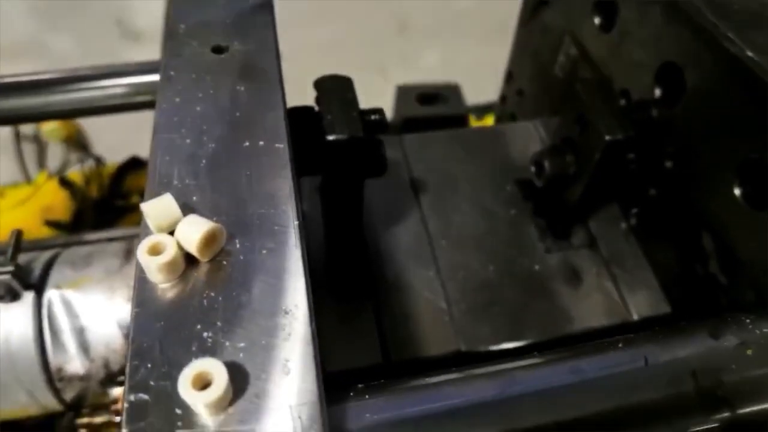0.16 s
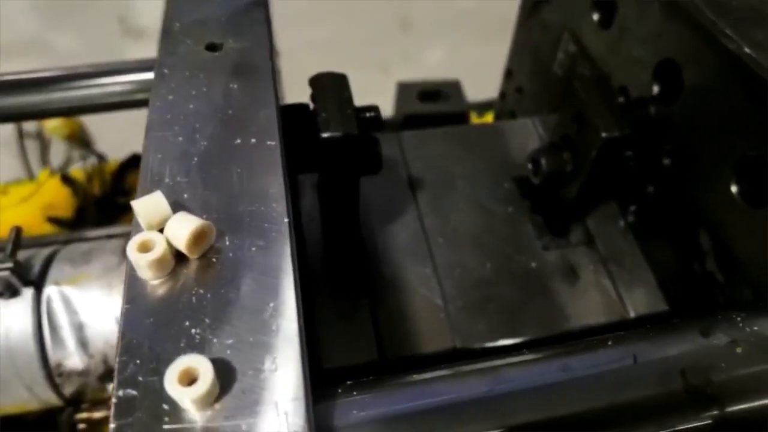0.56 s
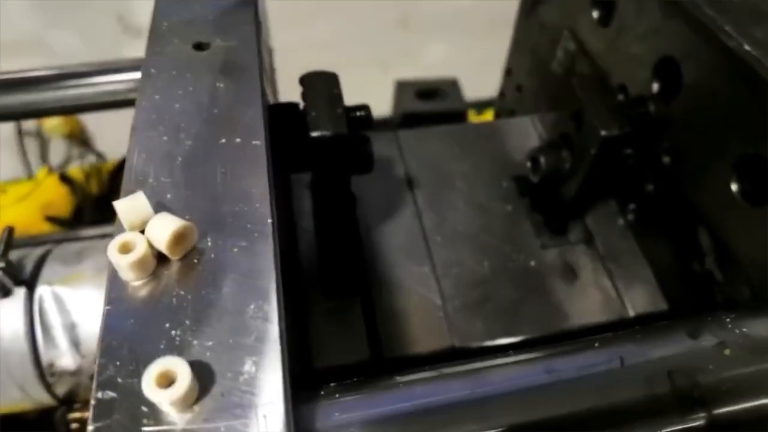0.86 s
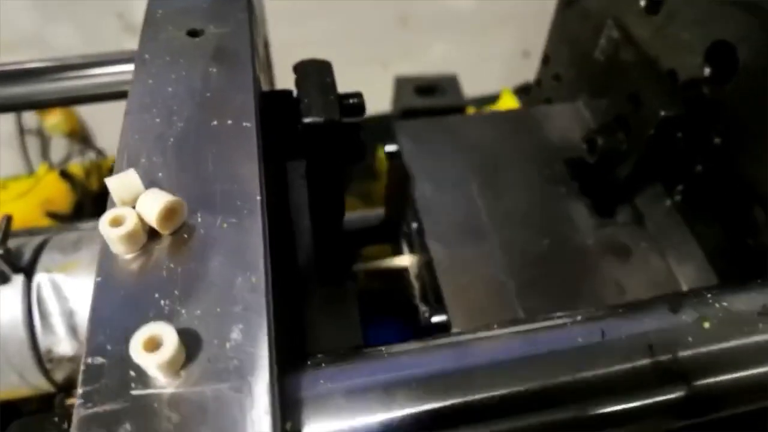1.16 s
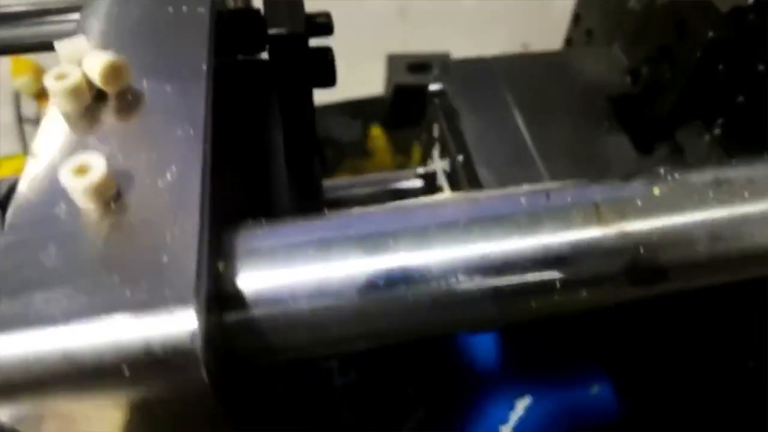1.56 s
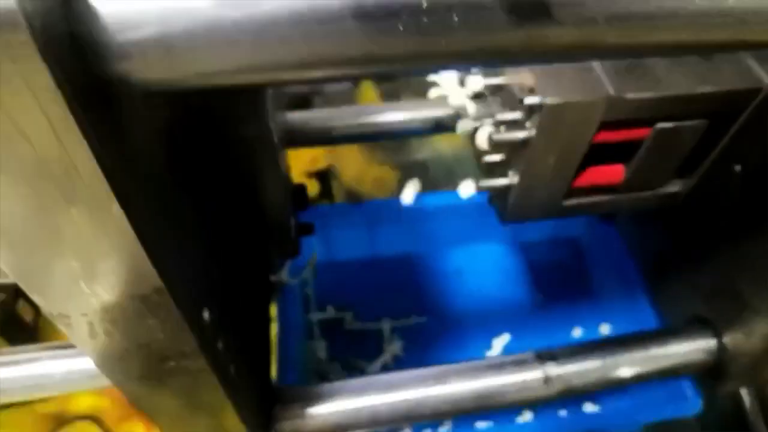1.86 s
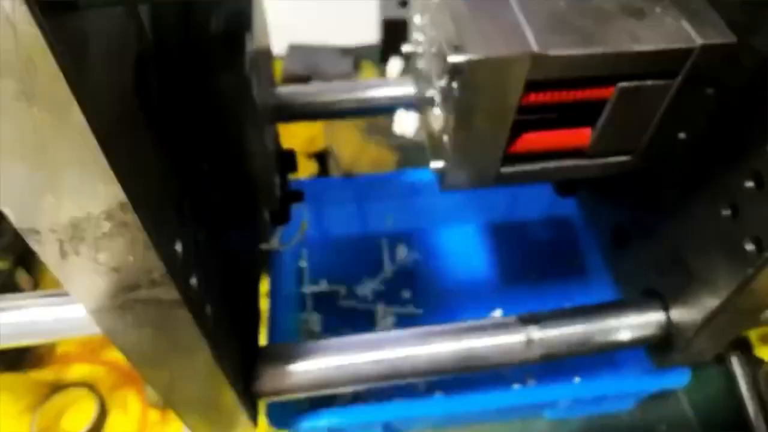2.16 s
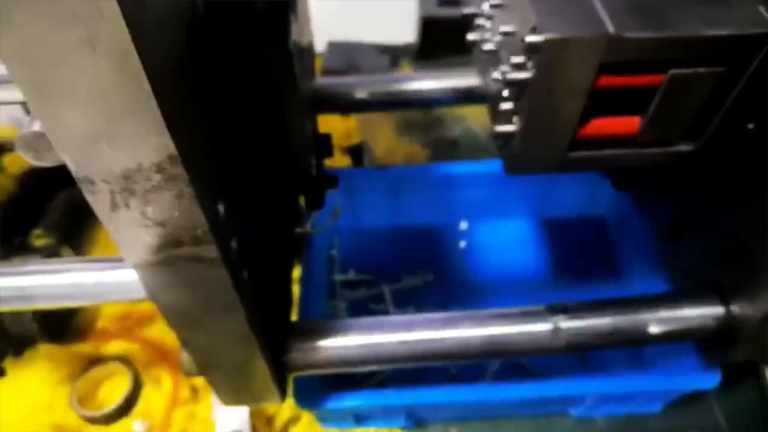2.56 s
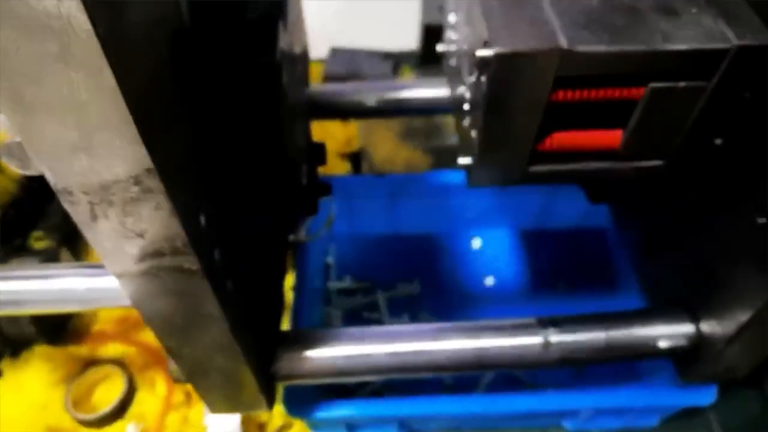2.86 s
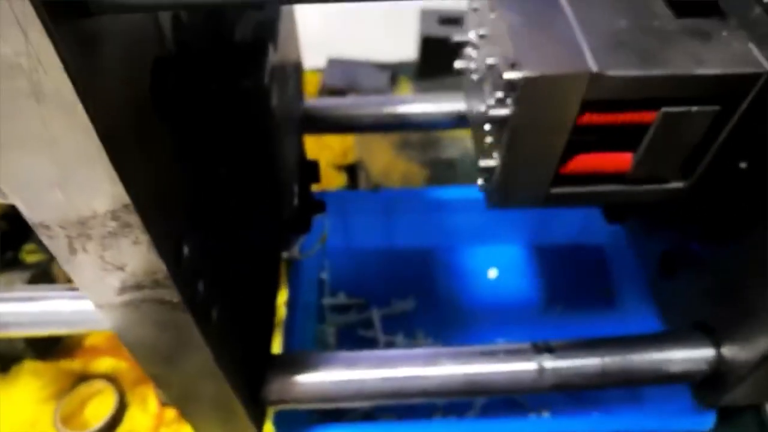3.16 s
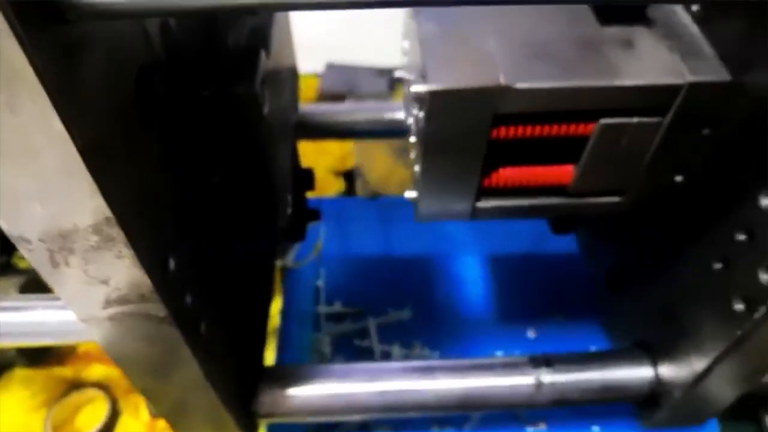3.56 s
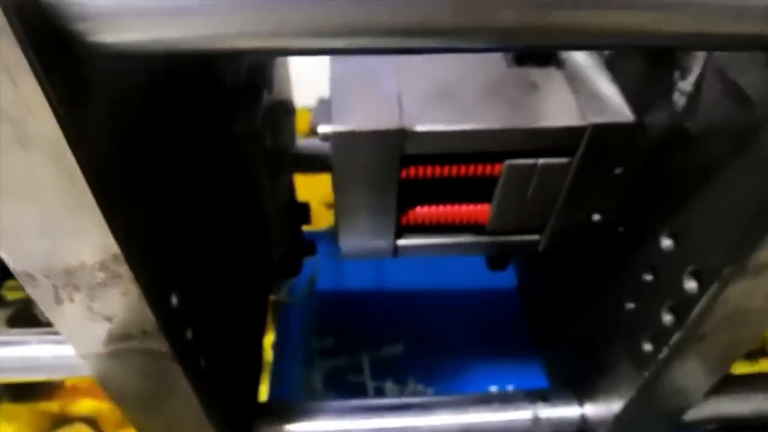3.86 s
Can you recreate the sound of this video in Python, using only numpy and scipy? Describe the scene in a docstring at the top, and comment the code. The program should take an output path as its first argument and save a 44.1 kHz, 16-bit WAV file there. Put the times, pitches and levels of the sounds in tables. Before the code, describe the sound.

A small injection molding machine whines, then its mold opens with rattling steel clacks and scrapes

```python
"""A pump's whine and oil rush come first, over thin drive whistles: a small injection molding machine, close
up. The mold cracks open in a rattle of steel clacks: shaped noise bursts, coloured by mold modes, with
reverberation. The platen scrapes and rumbles along its bars, and low groans glide down: filtered noise and
gliding tones; thuds boom below. A valve hisses briefly, then a panel drones as the platen returns; the workshop
is a bed of coloured noise."""
import sys
import numpy as np
from scipy import signal
from scipy.fft import rfft, irfft
from scipy.io import wavfile
from scipy.ndimage import uniform_filter1d

SR = 44100
rng = np.random.default_rng(int(sys.argv[2]) if len(sys.argv) > 2 else 0)


def generate_wav(sig):
    """Save sig (samples, or channels by samples) to the path in sys.argv[1] as 16-bit PCM at SR."""
    pcm = np.round(np.clip(np.atleast_2d(sig).T, -1, 1) * 32767).astype(np.int16)
    wavfile.write(sys.argv[1], SR, pcm)


N = 176400
T, BINS = np.arange(N) / SR, np.fft.rfftfreq(N, 1 / SR)  # time in s, spectrum bins in Hz

# All spectra below are relative: each sound is brought to a set loudness before its level is applied.
# Workshop background colour [f/Hz, level per Hz/dB]
SHOP_COLOUR = [(15, -44), (45, -9), (110, 6), (220, 2.5), (460, 1.5), (700, -5.5), (1350, -14), (1850, -8),
               (3700, -15.5), (8100, -12.5), (9300, -50.5)]
# Workshop background loudness [t/s, level/dB]
SHOP_LEVEL = [(2.3, -44.5), (3.2, -44), (3.55, -43.5), (3.75, -46.5)]

# Whistles of the motor drive [start t/s, end t/s, f/Hz, level/dB]
DRIVE_HZ = 8297
DRIVE_WHISTLES = [(0, 0.073, DRIVE_HZ, -32), (0.08, 0.326, DRIVE_HZ, -40.5),
                  (0.327, 0.418, DRIVE_HZ, -29.5), (0.41, 0.74, DRIVE_HZ, -36.5),
                  (0.727, 0.819, DRIVE_HZ, -25), (1.204, 2.53, DRIVE_HZ, -44), (2.53, 2.87, DRIVE_HZ, -52),
                  (0, 0.756, 7690, -38.5), (1.2, 2.866, 7710, -49), (2.966, 3.579, 8120, -47.5)]
WHISTLE_FADE_S, WHISTLE_JITTER = 0.008, 0.00015  # jitters are rms fractions of the pitch

# Upper multiples of the pump whine, before the whine level curve [multiple, level/dB]
WHINE_MULTIPLES = [(5, -37.5), (6, -44), (7, -37.5), (8, -43.5)]
# Level curve of the whine and hums, on top of their own levels [t/s, level/dB]
WHINE_LEVEL = [(0, 3.5), (.28, -2), (.79, 0), (.86, -14.5), (1.15, -13.5), (1.25, -40)]
# Loudness of the strong fourth multiple [t/s, level/dB]
FOURTH_LEVEL = [(0, -21), (.285, -24), (.295, -28.5), (.58, -33), (.63, -28), (.76, -27.5), (.82, -63.5), ]
# Colour of oil rushing through the pump [f/Hz, level per Hz/dB]
OIL_COLOUR = [(15, -38.5), (60, -11), (170, 2.5), (480, -1.5), (800, -2.5), (1500, -8.5), (2400, -5.5),
              (3900, -9), (8200, -8.5), (9300, -37)]
# Loudness of the oil rush [t/s, level/dB]
OIL_LEVEL = [(0, -25.5), (.27, -25), (.33, -29.5), (.5, -26), (.6, -26), (.79, -32.5), (.86, -36),
             (1.15, -38.5), (1.27, -37), (1.4, -76)]
WHINE_HZ, WHINE_JITTER, WAVER_DB = 712, 0.00028, 3.5
HUM_HZ, HUM_DB = 573, -37
LOW_HUM_HZ, LOW_HUM_DB = 466.5, -40.5
THIRD_STEP_S, THIRD_EARLY_DB, THIRD_DB = 0.19, -38.5, -32.5  # the third multiple steps up

# Valve hiss colour [f/Hz, level per Hz/dB]
VALVE_COLOUR = [(40, -22), (130, 7.5), (900, -25.5), (1800, -27), (2500, -0.5), (3200, -25), (3850, -4.5),
                (5600, -0.5), (7000, 5), (8000, -3), (11000, -44.5)]
VALVE_START_S, VALVE_HOLD_S, VALVE_RELEASE_S, VALVE_DB = 2.862, 0.065, 0.034, -31

# Heavy knocks that shake the cabinet [t/s, level/dB, f/Hz]
CABINET_THUDS = [(0.536, -19.5, 194), (0.887, -27, 164), (1.004, -32, 156), (1.146, -27, 185),
                 (1.612, -30, 267), (1.757, -25.5, 201.6), (2.208, -37.5, 248), (2.862, -34.5, 214)]
THUD_RISE_S, THUD_DECAY_S, THUD_RATTLE_DB = 0.004, 0.031, -2

# Low groans that glide down in pitch [start t/s, length/s, level/dB, first f/Hz]
LOW_GROANS = [(0.551, 0.27, -27.5, 190), (1.219, 0.18, -32, 199), (1.642, 0.11, -34, 165.7),
              (1.855, 0.178, -34.5, 160)]
GROAN_TO_HZ, GROAN_JITTER, GROAN_CATCH_DB, GROAN_OCTAVE_DB = 105.96, 0.05, 5.5, -11

# Colour of sliding steel before the mold modes [f/Hz, level per Hz/dB]
SLIDE_COLOUR = [(400, -31.5), (1000, -2), (2200, 6.5), (3800, -1.5), (6100, 6.5), (8000, 1), (9500, -17),
                (11000, -65)]
# Loudness of the scrape [t/s, level/dB]
SLIDE_LEVEL = [(.45, -40.5), (.56, -32.5), (.8, -24), (.87, -27), (1.12, -25.5), (1.22, -34), (1.38, -52),
               (1.49, -36), (1.57, -45), (1.65, -36), (1.73, -44.5), (1.79, -34), (1.88, -43), (2.25, -47),
               (2.8, -46.5), (3.1, -79)]
# Colour of the platen's rumble [f/Hz, level per Hz/dB]
RUMBLE_COLOUR = [(30, -28.5), (60, -19), (80, -2), (125, 0), (230, -2), (330, -10), (600, -21), (1500, -55)]
# Loudness of the rumble [t/s, level/dB]
RUMBLE_LEVEL = [(.51, -48.5), (.54, -27.5), (.805, -32.5), (.83, -68.5), (1.14, -51.5), (1.23, -32.5),
                (1.43, -50.5), (1.58, -45.5), (1.63, -35), (1.8, -37), (1.98, -37.5), (2.15, -48.5),
                (2.3, -42), (2.45, -58), (2.9, -46.5), (3.2, -40.5), (3.75, -72)]
# Loudness of the panel set droning by the returning platen [t/s, level/dB]
DRONE_LEVEL = [(3.04, -90), (3.09, -33), (3.16, -50), (3.23, -27.5), (3.3, -41), (3.37, -33), (3.42, -51.5),
               (3.56, -41), (3.65, -65)]
DRONE_HZ, DRONE_WIDTH_HZ = 197.5, 27
GRIT_PER_S, GRIT_DB = 310, 2.5

# Slow swells in spectral patches, over a constant random unevenness of colour (dB rms)
PATCH_DB, STATIC_RIPPLE_DB = 2.5, 1.8

# Steel clacks of mold and ejector
# [t/s, level/dB, decay/ms, ring f/Hz, ring level/dB, body f/Hz, body level/dB]
STEEL_CLACKS = [(0.289, -13, 1.4, 5960, 36, 4100, 12.5), (0.296, -11.5, 3.3, 6060, 17, 4070, 14.5),
                (.532, -13, 5.1, 7750, -20.5, 650, 22.5), (0.818, -6.5, 1.5, 5870, 14, 4800, 0),
                (.839, -18, 5.2, 5940, -4, 2900, 5.5), (.894, -16, 3.8, 6000, 9.5, 1480, 13),
                (.894, -20, 28, 1330, 12, 960, 33), (0.936, -21, 5.3, 5980, 1, 1200, 18),
                (.944, -12, 3.2, 5880, 9, 3300, -8), (0.962, -12.5, 6.8, 6500, 8.5, 3000, 8),
                (1.002, -16.5, 7.4, 6260, 8, 2220, -9), (1.030, -13, 7.5, 6000, 17.5, 3180, 13),
                (1.041, -18, 3.9, 6200, 15.5, 2105, 23.5), (1.071, -37.5, 2.8, 6260, -13, 3170, 11),
                (1.146, -14, 5.7, 7650, 9, 1680, 15), (1.189, -9, 1.5, 6300, 14.5, 4340, -16),
                (1.239, -24.5, 9.6, 6200, 24.5, 4200, 20.5), (1.306, -30.5, 22, 6150, 9, 3000, -21),
                (1.454, -18.5, 4.6, 8500, 3.5, 1120, 4.5), (1.615, -16.5, 6, 8200, 11, 5360, 6),
                (1.756, -17, 8.5, 7830, 8.5, 750, 15.5), (1.764, -20, 24, 8400, 20.5, 1800, 20),
                (1.869, -26.5, 5.3, 7900, 28, 2100, -1), (1.92, -29, 14, 7900, 14.5, 2050, 11),
                (2.066, -12, 3.5, 6100, 2, 1070, 7.5), (2.299, -29.5, 9, 6070, 15, 4070, 17),
                (2.862, -26.5, 6.7, 6700, -2, 1930, 7.5),]
# Colour shared by all clacks, before resonances [f/Hz, level per Hz/dB]
STEEL_COLOUR = [(60, -32.5), (520, -9.5), (880, -8), (1500, -6), (3300, 0.5), (5500, 0.5), (8200, 3.5),
                (9500, -5.5), (11000, -43)]
# Modes of the steel mold, heard in clacks, scrape and reverberation [f/Hz, level/dB]
MOLD_MODES = [(856, -2), (1120, -3), (1830, -9.5), (2120, -9.5), (2982, -5.5), (4199, -4.5), (5330, -3),
              (5712, -4.5), (6250, -5.5), (7074, -8)]
# Reverberation time of the workshop [f/Hz, t60/s]
ROOM_T60 = [(150, 0.28), (1000, 0.24), (4000, 0.43), (9000, 0.37)]
CLACK_RISE_S, RING_WIDTH_HZ, BODY_WIDTH_HZ, MODE_WIDTH_HZ = 0.0023, 460, 200, 200
RING_ON_DB, ROOM_RIPPLE_DB = -8, 4.5

STOP_S, STOP_FADE_S, EDGE_HZ = 3.797, 0.016, 9900


def amp(db):
    """Decibels to gain."""
    return 10 ** (np.asarray(db) / 20)


def evened(x):
    """Scales to rms 1."""
    return x / np.sqrt(np.mean(x ** 2) + 1e-20)


def read(points, hz):
    """Reads a frequency table on a log-frequency axis."""
    f, value = np.transpose(points)
    return np.interp(np.log(hz + 1), np.log(f + 1), value)


def level(points):
    """A level curve as gain per sample."""
    return amp(np.interp(T, *np.transpose(points)))


def add(mix, s, sound):
    """Mixes a sound in at time s."""
    part = mix[max(round(s * SR), 0):][:len(sound)]
    part += sound[:len(part)]


def wander(rate_hz):
    """Slow random drift of rms 1, mostly below the given rate."""
    return evened(irfft(rfft(rng.standard_normal(N)) / (1 + (BINS / rate_hz) ** 4), N))


def noise(spectrum):
    """Noise of rms 1 with the given colour."""
    return evened(irfft(rfft(rng.standard_normal(N)) * amp(read(spectrum, BINS)), N))


def steadied(x, seconds):
    """Takes the chance swells out of a noise by dividing by its running rms."""
    power = uniform_filter1d(x ** 2, max(int(seconds * SR), 2))
    return x / np.sqrt(abs(power) + 1e-9)


def tone(hz, jitter, waver_db):
    """A sine of rms 1 that wavers in pitch and level."""
    turns = np.cumsum(hz * (1 + jitter * wander(25))) / SR
    return evened(np.sin(2 * np.pi * turns) * amp(waver_db * wander(19)))


def patchy(x):
    """Narrow spectral regions swell and fade independently, over a random uneven colour that stays constant."""
    z = signal.stft(x, nperseg=1024, noverlap=768)[2]
    across_pitch = uniform_filter1d(rng.standard_normal(z.shape), size=4, axis=0)
    swells = evened(uniform_filter1d(across_pitch, size=22, axis=1))
    static_ripple = evened(uniform_filter1d(rng.standard_normal(len(z)), size=2))[:, None]
    gain = amp(PATCH_DB * swells + STATIC_RIPPLE_DB * static_ripple)
    return evened(signal.istft(z * gain, nperseg=1024, noverlap=768)[1][:N])


def mold_peaks(hz):
    """Gain that lifts the regions around the modes of the mold."""
    peaks = sum(amp(db) ** 2 / (1 + (2 * (hz - f) / MODE_WIDTH_HZ) ** 2) ** 2 for f, db in MOLD_MODES)
    return np.sqrt(0.5 + 2 * peaks)


def workshop():
    """Background air of the shop: coloured noise with slow spectral swells."""
    return patchy(noise(SHOP_COLOUR)) * level(SHOP_LEVEL)


def drive():
    """Thin switching whistles of the motor drive: near-steady sines that step in level."""
    out = np.zeros(N)
    for start, end, hz, db in DRIVE_WHISTLES:
        gate = np.clip(np.minimum(T - start, end - T) / WHISTLE_FADE_S + 0.5, 0, 1)
        out += amp(db) * gate * tone(hz, WHISTLE_JITTER, waver_db=3.0)
    return out


def pump():
    """Whine at multiples of one tone, two hums and oil noise, on level curves that rise and fall, then die away."""
    whine = sum(amp(db) * tone(k * WHINE_HZ, WHINE_JITTER, WAVER_DB) for k, db in WHINE_MULTIPLES)
    third_gain = amp(np.where(T < THIRD_STEP_S, THIRD_EARLY_DB, THIRD_DB))
    whine = whine + third_gain * tone(3 * WHINE_HZ, WHINE_JITTER, WAVER_DB)
    hums = amp(HUM_DB) * tone(HUM_HZ, 0.0011, waver_db=2.5)
    hums = hums + amp(LOW_HUM_DB) * tone(LOW_HUM_HZ, 0.0052, WAVER_DB)
    fourth = level(FOURTH_LEVEL) * tone(4 * WHINE_HZ, WHINE_JITTER, waver_db=0.8)
    oil_rush = patchy(noise(OIL_COLOUR)) * level(OIL_LEVEL)
    return (whine + hums) * level(WHINE_LEVEL) + fourth + oil_rush


def valve():
    """A short hiss of coloured noise that holds, then dies exponentially."""
    age = T - VALVE_START_S
    release = np.exp(-np.maximum(age - VALVE_HOLD_S, 0) / VALVE_RELEASE_S)
    return amp(VALVE_DB) * noise(VALVE_COLOUR) * (age > 0) * release


def thuds():
    """Cabinet booms: a decaying low sine, with loose panels rattling as noise around its pitch."""
    out = np.zeros(N)
    for s, db, hz in CABINET_THUDS:
        age = np.maximum(T - s, 0)
        band = (BINS / hz) ** 2 / (1 + (BINS / hz) ** 2) ** 2
        rattle = evened(irfft(rfft(rng.standard_normal(N)) * band, N))
        boom = np.sin(2 * np.pi * hz * age) + amp(THUD_RATTLE_DB) * steadied(rattle, THUD_DECAY_S)
        out += amp(db) * boom * np.minimum(age / THUD_RISE_S, 1) * np.exp(-age / THUD_DECAY_S)
    return out


def groans():
    """Low groans: unsteady tones and their octaves, falling in pitch."""
    out = np.zeros(N)
    for start, length, db, first_hz in LOW_GROANS:
        along = np.clip((T - start) / length, 0, 1)
        hz = first_hz * (GROAN_TO_HZ / first_hz) ** along
        voice = tone(hz, GROAN_JITTER, GROAN_CATCH_DB)
        octave = tone(2 * hz, GROAN_JITTER, GROAN_CATCH_DB)
        swell = np.sqrt(abs(np.sin(np.pi * along)))
        out += amp(db) * swell * (voice + amp(GROAN_OCTAVE_DB) * octave)
    return out


def platen():
    """Sliding steel scrapes with small catches, the mass rumbles, and a resonant panel drones on the return."""
    catches = (rng.random(N) < GRIT_PER_S / SR) * rng.uniform(0.18, 1, N)
    # each catch dies away with a 3 ms time constant
    grit = evened(signal.lfilter([1], [1, -np.exp(-1 / (0.003 * SR))], catches))
    rubbing = noise(SLIDE_COLOUR) * (1 + amp(GRIT_DB) * grit)
    scrape = patchy(irfft(rfft(rubbing) * mold_peaks(BINS), N)) * level(SLIDE_LEVEL)
    rumble = steadied(noise(RUMBLE_COLOUR), seconds=0.074) * level(RUMBLE_LEVEL)
    resonance = 1 / (1 + (2 * (BINS - DRONE_HZ) / DRONE_WIDTH_HZ) ** 2)
    panel = evened(irfft(rfft(rng.standard_normal(N)) * resonance, N))
    return scrape + rumble + steadied(panel, seconds=0.018) * level(DRONE_LEVEL)


def surroundings():
    """Reverberation of the shop: noise decaying by frequency, with random uneven colour and the mold modes."""
    hz, t, z = signal.stft(rng.standard_normal(SR // 2), SR, nperseg=512)
    ripple = ROOM_RIPPLE_DB * np.clip(rng.standard_normal((len(hz), 1)), -2, 1)
    decay_db = -60 * t / read(ROOM_T60, hz)[:, None]
    room = signal.istft(z * amp(ripple + decay_db), SR, nperseg=512)[1]
    room = irfft(rfft(room) * mold_peaks(np.fft.rfftfreq(len(room), 1 / SR)))
    return room / np.linalg.norm(room)


def clack(db, decay_ms, ring_hz, ring_db, body_hz, body_db, size=4096):
    """A dense cluster of tiny steel contacts, as a noise burst with two short resonances and the mold modes."""
    t = (np.arange(size) - size // 8) / SR  # the peak lies an eighth of the way in
    hz = np.fft.rfftfreq(size, 1 / SR)
    contacts = rng.standard_normal(size)
    shape = np.exp(np.minimum(t / CLACK_RISE_S, -t * 1000 / decay_ms))
    ring = amp(ring_db) / (1 + 2j * (hz - ring_hz) / RING_WIDTH_HZ)
    body = amp(body_db) / (1 + 2j * (hz - body_hz) / BODY_WIDTH_HZ)
    resonances = np.sqrt(1 + abs(ring) ** 2 + abs(body) ** 2)
    random_ripple = evened(uniform_filter1d(rng.standard_normal(len(hz)), size=26))
    random_ripple_db = 3 * np.clip(random_ripple, -2, 1)
    colour = amp(read(STEEL_COLOUR, hz) + random_ripple_db) * mold_peaks(hz) * resonances
    burst = steadied(irfft(rfft(contacts) * colour, size), seconds=0.0024) * shape
    # the burst takes the energy of its shape, whatever its colour
    return amp(db) * burst * np.linalg.norm(shape) / np.linalg.norm(burst), t[0]


def mold():
    """Steel clacks of the mold and ejector, each ringing on in the reverberation by convolution."""
    direct = np.zeros(N)
    for s, *blow in STEEL_CLACKS:
        sound, lead = clack(*blow)
        add(direct, s + lead, sound)
    ring_on = signal.fftconvolve(direct, surroundings())[:N]
    return direct + amp(RING_ON_DB) * ring_on


def scene():
    """All sources sum to one signal, the same in both channels."""
    background = workshop() + drive() + pump()
    mono = background + valve() + thuds() + groans() + platen() + mold()
    return np.array([mono, mono])


def record(dry):
    """Fades quickly to silence shortly before the end, then removes the treble above the band edge."""
    gated = dry * np.clip((STOP_S - T) / STOP_FADE_S, 0, 1)
    lowpass = signal.firwin(255, EDGE_HZ, window=("kaiser", 8), fs=SR)
    return signal.oaconvolve(gated, lowpass[None], "same")


dry = scene()
out = record(dry)
generate_wav(out)
```